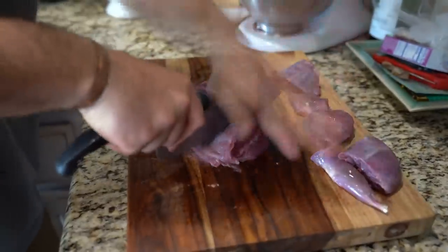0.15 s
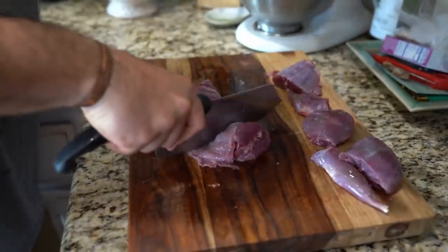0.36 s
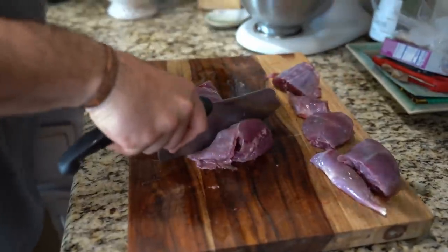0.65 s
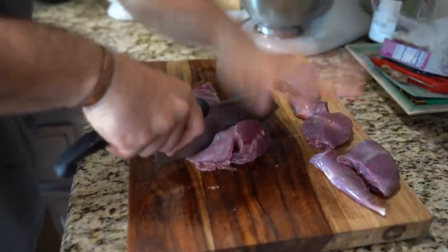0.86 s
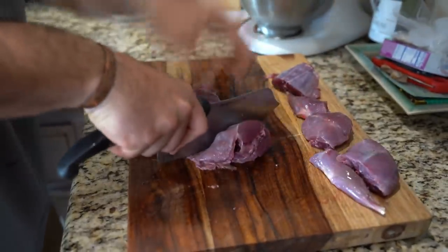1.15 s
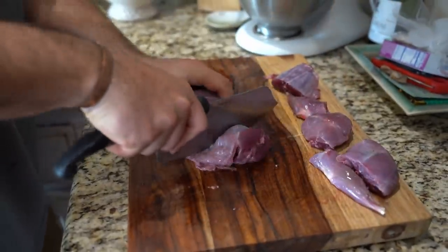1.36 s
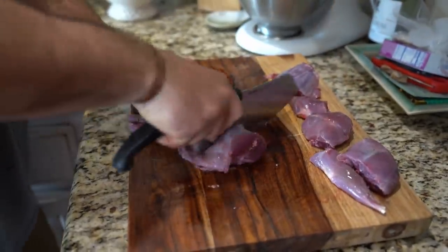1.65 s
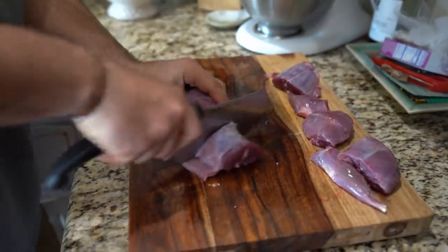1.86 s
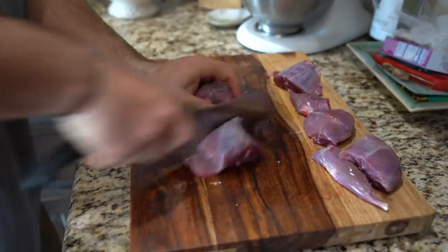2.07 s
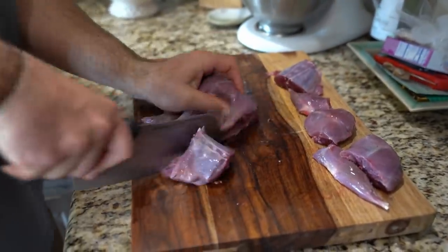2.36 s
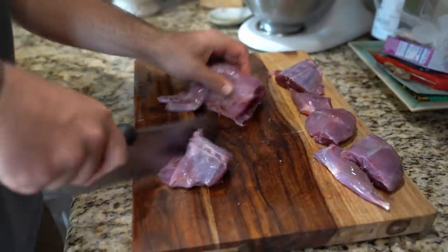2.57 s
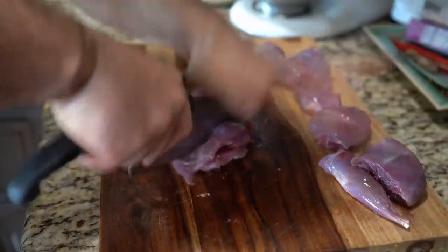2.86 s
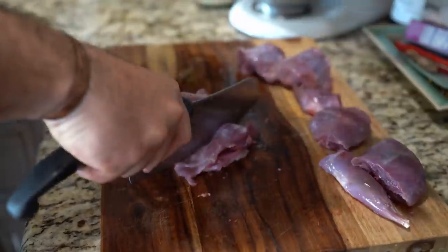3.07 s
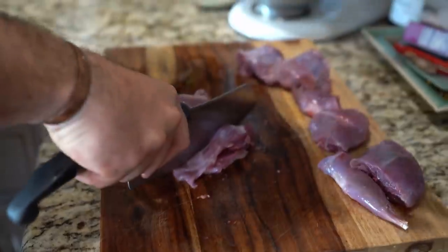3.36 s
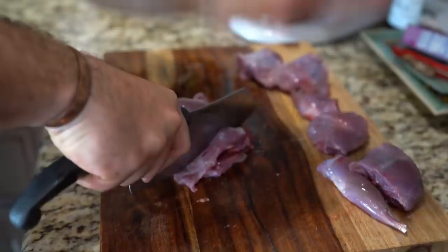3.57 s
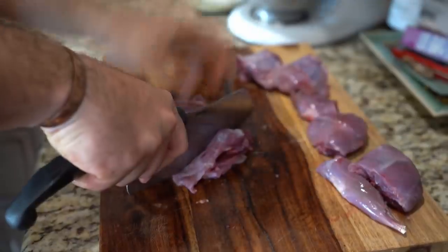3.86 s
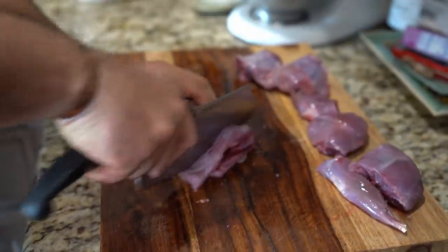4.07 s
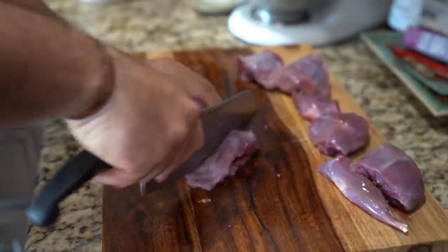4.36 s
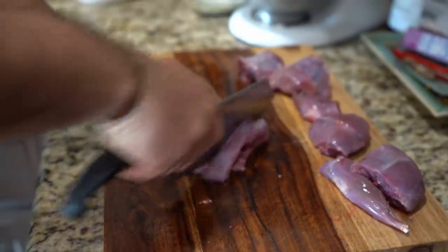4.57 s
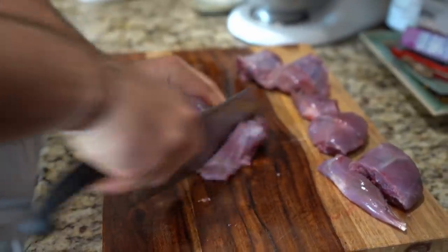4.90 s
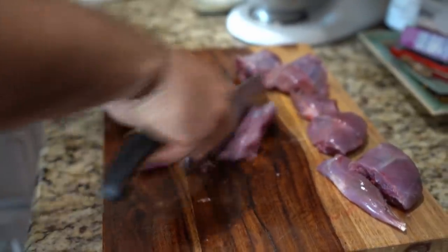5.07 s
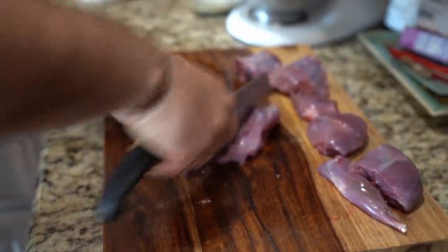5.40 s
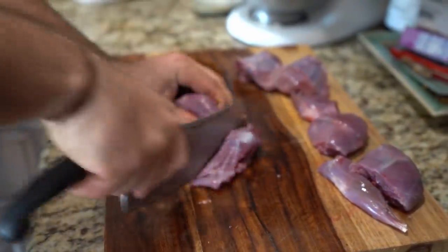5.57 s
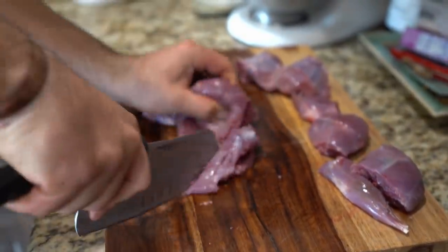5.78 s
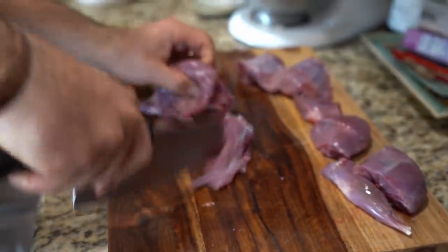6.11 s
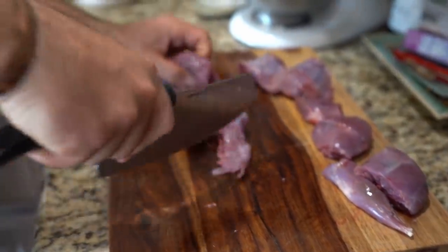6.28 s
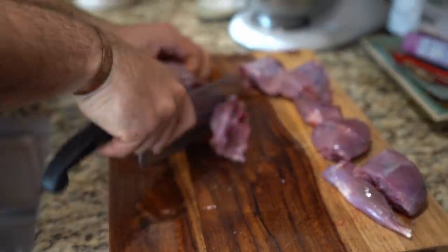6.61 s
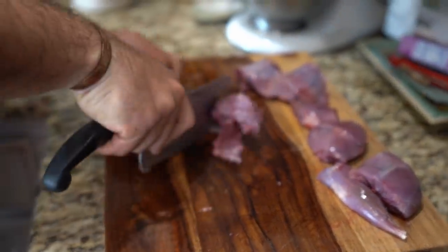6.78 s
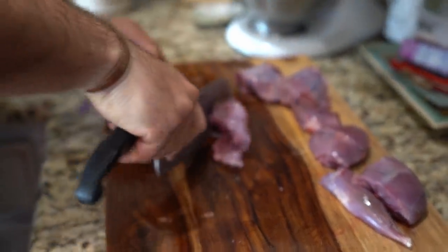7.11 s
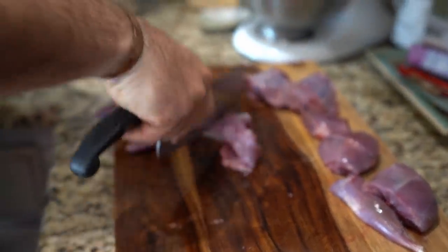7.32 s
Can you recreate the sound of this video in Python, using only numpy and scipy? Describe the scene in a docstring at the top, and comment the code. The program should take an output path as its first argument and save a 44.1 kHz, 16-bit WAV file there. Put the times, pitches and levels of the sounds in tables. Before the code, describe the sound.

Close up in a kitchen, a big knife is pounded through bony meat with cracking thuds, then saws with wet scrapes, snaps and knocks.

```python
"""A big knife joints raw meat on a thick board, close up: twice three palm blows, then sawing.
Blows, stick-slip sawing, bone snaps and knocks are forces on five resonant bodies:
counter, board, blade, cracking bone and knife edge. Flesh adds sliding wet resonances and bursting films.
Pressed board and blade ring on, the kitchen echoes with decaying noise, fridge and ventilation hum.
The recorder's limiter ducks after each heavy blow."""
import sys
import numpy as np
from scipy import signal
from scipy.fft import rfft, irfft
from scipy.io import wavfile
from scipy.ndimage import minimum_filter1d

SR = 44100
rng = np.random.default_rng(int(sys.argv[2]) if len(sys.argv) > 2 else 0)


def master_out(mix):
    """Clip the mix to full scale and print it as 16-bit PCM to the path in sys.argv[1]."""
    frames = np.transpose(np.atleast_2d(mix))
    ceiling = np.clip(frames, -1, 1)
    pcm = np.round(ceiling * 32767).astype(np.int16)
    wavfile.write(sys.argv[1], SR, pcm)


N = 328541
RING = 2 ** 15   # response length, samples
HOLD_10MS = np.sqrt(SR / 100)   # scales unit energy to rms 1 over 10 ms


def from_db(db):
    """Amplitude ratio."""
    return 10 ** (np.asarray(db) / 20)


def unit_energy(x):
    """Scale to energy 1."""
    return x / np.sqrt(np.sum(x ** 2) + 1e-20)


def rms_one(x):
    """Scale to rms 1."""
    return unit_energy(x) * np.sqrt(len(x))


def at_hz(points, hz):
    """Read a spectrum on a log-frequency axis."""
    f, value = np.transpose(points)
    return np.interp(np.log(np.maximum(hz, 1)), np.log(f), value)


def through(x, response):
    """Drive a response with x."""
    return signal.fftconvolve(x, response)[:N]


def drift(knots_per_s):
    """Random values joined by straight lines; spread 1 at the knots."""
    knots = rng.standard_normal(4096)
    return np.interp(np.arange(N) / SR * knots_per_s, np.arange(len(knots)), knots)


def colour(spectrum):
    """Minimum-phase response with this spectrum, by folding the cepstrum; energy 1."""
    log_gain = np.log(from_db(at_hz(spectrum, np.fft.rfftfreq(RING, 1 / SR))))
    cepstrum = irfft(log_gain)
    cepstrum[1:RING // 2] *= 2
    cepstrum[RING // 2 + 1:] = 0
    return unit_energy(irfft(np.exp(rfft(cepstrum))))


def fracture(splinter_s, snap_share):
    """A break that trails off in splinters, whitened to equal strength at all pitches; energy 1."""
    t = np.arange(2048) / SR
    splinters = unit_energy(rng.standard_normal(len(t)) ** 3 * np.exp(-t / splinter_s))
    spectrum = rfft(splinters + snap_share * (t == 0), 2 * len(t))
    return unit_energy(irfft(spectrum / np.abs(spectrum))[:len(t)])


def contacts(table, give_s, splinter_s, snap_share):
    """Forces on the five bodies: a push on the counter, then a burst on the others give_s later."""
    force = np.zeros((5, N + RING))
    for s, *levels_db in table:
        push = from_db(levels_db) * HOLD_10MS
        start, breaks = int(s * SR), int((s + give_s) * SR)
        burst = fracture(splinter_s, snap_share)
        force[0, start] += push[0]
        force[1:, breaks:breaks + len(burst)] += push[1:, None] * burst
    return force[:, :N]


# palm blows on the spine:
# (time [s], thump level [dB], wood level [dB], blade level [dB], crack level [dB], edge level [dB])
PALM_BLOWS = [(0.169, 12, 7.5, 0.5, -3.5, -10.5), (0.5030, 14, 9, 2.5, -4.5, -31),
              (0.818, 11, -2, -11.5, -18, -57), (2.841, 10.5, 3.5, 6.5, 1, -8.5),
              (3.1928, 16, 4.5, 2, 4, -6.5), (3.5000, 16.5, 7.5, 6.5, -1, -45)]


def blows():
    """Forces of the palm driving the blade into bone, which breaks a moment after the push."""
    return contacts(PALM_BLOWS, give_s=0.00332, splinter_s=0.01, snap_share=0.11)


def palm(slap_db, soft_hz):
    """The soft slap of the hand, a heavily damped swing just before the bone breaks."""
    clicks = np.zeros(N)
    for s, thump_db, *rest in PALM_BLOWS:
        clicks[int(s * SR)] = from_db(thump_db + slap_db) * HOLD_10MS
    t = np.arange(RING) / SR
    return through(clicks, unit_energy(np.exp(-np.pi * soft_hz * t) * np.sin(2 * np.pi * soft_hz * t)))


# knife strokes: (start [s], length [s], pressure level [dB], crunch level re pressure [dB])
KNIFE_STROKES = [(0.0, 0.089, -32.5, -12), (1.37, 0.36, -40.5, -3.5), (1.536, 0.1, -9.5, -10),
                 (1.694, 0.11, -11.5, -13), (1.88, 0.081, -9, -15.5), (2.02, 0.18, -9, -16.5),
                 (2.2, 0.12, -20.5, -12), (2.342, 0.083, -16, -14), (2.535, 0.055, -30.5, -8.5),
                 (3.919, .14, -35.5, -8), (4.072, 0.15, -27.5, -6.5), (4.296, 0.081, -23.5, -5.5),
                 (4.413, 0.069, -17, -1), (4.494, 0.085, -30, -4), (4.593, 0.06, -19, 0),
                 (4.699, 0.06, -10.5, -5), (4.81, 0.11, -26, -7.5), (4.855, 0.078, -15, -4),
                 (4.993, .11, -11, -5.5), (5.131, 0.083, -16.5, -3.5), (5.275, 0.054, -10, -4.5),
                 (5.339, 0.22, -22, -2.5), (5.44, 0.12, -7, -11), (5.562, 0.077, -18, -7),
                 (5.629, 0.14, -13.5, -13), (5.886, 0.038, -33.5, 1.5), (6.545, 0.043, -40.5, 2.5),
                 (6.59, 0.059, -30, -8), (6.68, 0.062, -29.5, -3), (6.816, 0.26, -36.5, -4.5)]
ATTACK_S, SAG_DB_PER_S, RELEASE_DB_PER_S = 0.028, 22, 413   # edge bites, eases off, lets go
WET_DB, WET_DB_PER_CRUNCH_DB = -8, 0.99   # wetness at 0 dB crunch; slope


def stroke_gains():
    """Pressure, crunch and wetness: all strokes share one shape, torn fibres let out juice."""
    pressure, crunch = np.zeros((2, N))
    for start, length, pressure_db, crunch_db in KNIFE_STROKES:
        first = max(int(start * SR), 0)
        age = np.arange(min(RING, N - first)) / SR
        sag_db = SAG_DB_PER_S * (age - length / 2)
        release_db = RELEASE_DB_PER_S * np.maximum(age - length, 0)
        effort = np.minimum(age / ATTACK_S, 1) * from_db(pressure_db - sag_db - release_db)
        span = slice(first, first + len(age))
        pressure[span] = np.maximum(pressure[span], effort)
        crunch[span] = np.maximum(crunch[span], effort * from_db(crunch_db))
    return pressure, crunch, from_db(WET_DB) * crunch ** WET_DB_PER_CRUNCH_DB


def slips(per_s, spread_db):
    """Random tiny slips of uneven size and either sign; rms 1."""
    sizes = from_db(spread_db * np.minimum(rng.exponential(1, N), 4)) * rng.choice([-1, 1], N)
    return rms_one(sizes * (rng.random(N) < per_s / SR))


def sawing(pressure, crunch, wetness):
    """Forces on the five bodies as the edge sticks and slips through fibres and along the wood."""
    grip = from_db(2.9 * drift(110))
    fibres = slips(1100, spread_db=0)   # shared by scrape, tear and hiss
    scrape_slips = 0.5 * fibres + 0.65 * slips(1500, spread_db=4.5)
    tear_slips = 1.2 * fibres + 1.22 * slips(2000, spread_db=0)
    hiss_slips = 0.18 * fibres + 0.95 * slips(5600, spread_db=-4)
    rumble = from_db(-4) * crunch * slips(1800, spread_db=-0.5)
    # contact wanders along the edge: drag, scrape and tear each get spurts of their own
    drag = from_db(-10.5) * pressure * from_db(1.6 * drift(90)) * slips(3000, spread_db=0)
    scrape = from_db(-9) * pressure * from_db(1.44 * drift(120)) * scrape_slips
    tear = from_db(-8.5) * crunch * from_db(1.6 * drift(150)) * tear_slips
    hiss = from_db(-4.5) * wetness * hiss_slips
    return grip * np.array([rumble, drag, scrape, tear, hiss])


def shared(strike_db, brightness_db, share_db):
    """Levels of wood, blade, crack and edge [dB]: a brighter contact favours the higher bodies."""
    octaves_re_blade = np.array((-1.15, 0, 0.85, 2.4))
    return strike_db + np.array(share_db) + brightness_db * octaves_re_blade


# bone and gristle giving way: (time [s], strike level [dB], brightness [dB/octave])
BONE_SNAPS = [(1.5472, -32, -6), (1.573, -24.5, 4), (1.7025, -21, -2.5), (1.7607, -18.5, -2),
              (2.2621, -26.5, -8.5), (2.36, -24.5, -3.5), (2.381, -19.5, -2), (4.1224, -26.5, -5),
              (4.177, -21.5, -2.5), (4.427, -15.5, -1.5), (4.7235, -12, -1.5), (4.7381, -9.5, -4),
              (4.7615, -10, -1.5), (4.892, -20.5, -1), (4.992, -29.5, 6), (5.0313, -7.5, -1.5),
              (5.081, -8.5, -1), (5.2073, -15, 4), (5.2312, -13, 0.5), (5.2671, -16.5, -0.5),
              (5.2917, -9.5, -1), (5.4479, -13.5, 0.5), (5.51, -15.5, 0.5), (5.655, -18, -2.5),
              (5.947, -44, 2), (5.975, -41, 6), (6.0166, -41.5, 4.5), (6.7018, -31.5, 1.5),
              (6.9168, -32.5, 4.5)]
SNAP_SHARE_DB = (-4, -2, -2, -9.5)   # wood, blade, crack, edge
SNAP_THUMP_DB = -4.5   # push on the counter re strike


def snaps():
    """Forces of splintering bone; the harder the snap, the more it shakes the counter."""
    rows = [(s, db + SNAP_THUMP_DB, *shared(db, bright, SNAP_SHARE_DB)) for s, db, bright in BONE_SNAPS]
    return contacts(rows, give_s=0, splinter_s=0.0052, snap_share=0.25)


# light knocks on the board, the first a dull, dying blow:
# (time [s], thump level [dB], strike level [dB], brightness [dB/octave])
BOARD_KNOCKS = [(0.003, -16.5, -33.5, -13), (1.2377, -18, -21.5, -7.5), (1.3612, -20.5, -14, 0.5),
                (2.055, -26, -23, 2), (2.5015, -48, -35, -4.5), (4.4579, -6.5, -10.5, 0.5),
                (5.3155, -6.5, -12, 4), (5.352, -10.5, -22, -7), (5.572, -13, -32, 7.5),
                (5.775, -13, -30, 1), (6.1175, -16, -27, 4.5), (6.635, -19, -38, -12),
                (6.7715, -40, -25.5, -3), (7.2528, -9.5, -25, -2.5), (7.2815, -14.5, -31, -5.5)]
KNOCK_SHARE_DB = (-4.5, -3, -6, -12.5)   # wood, blade, crack, edge


def knocks():
    """Forces of a dull, dying blow, then of knife and meat knocking on the board: a short burst each."""
    rows = [(s, thump_db, *shared(db, bright, KNOCK_SHARE_DB)) for s, thump_db, db, bright in BOARD_KNOCKS]
    return contacts(rows, give_s=0, splinter_s=0.005, snap_share=0.9)


def slither(centre_hz, swing_octaves, knots_per_s):
    """A wet gap beside the blade whose resonance slides as it opens and closes; rms 1."""
    hz = centre_hz * 2 ** (swing_octaves * drift(35))
    level = drift(knots_per_s) * from_db(2.6 * drift(45))
    return rms_one(level * np.sin(2 * np.pi * np.cumsum(hz) / SR))


def squelch(per_s, cycles, low_hz, high_hz):
    """Tiny wet films burst, each falling 60 dB in some cycles of its own rising pitch; rms 1."""
    t, out = np.arange(1024) / SR, np.zeros(N + 1024)
    for when, pitch, size, rise in rng.random((int(per_s * N / SR), 4)):
        hz, start = low_hz * (high_hz / low_hz) ** pitch, int(when * N)
        age = t * hz / cycles
        ring = from_db(-60 * age) * np.sin(2 * np.pi * hz * t * (1 + 0.32 * rise * age))
        out[start:start + len(t)] += from_db(20 * size ** 2) * unit_energy(ring)
    return rms_one(out[:N])


def flesh(pressure, crunch, wetness):
    """The meat's own voice: sliding cavities, large and small squelching pockets, fine wet crackle."""
    deep = from_db(-18) * pressure * slither(centre_hz=528.6, swing_octaves=0.6, knots_per_s=310)
    middle = from_db(-11.5) * pressure * slither(centre_hz=1370, swing_octaves=0.33, knots_per_s=260)
    bright = from_db(-11) * crunch * slither(centre_hz=2592, swing_octaves=0.35, knots_per_s=560)
    squish = from_db(-13.5) * pressure * squelch(per_s=180, cycles=32, low_hz=1000, high_hz=1900)
    pockets = from_db(-4) * crunch * squelch(per_s=330, cycles=32, low_hz=1160, high_hz=4030)
    crackle = from_db(-9) * wetness * squelch(per_s=110, cycles=69, low_hz=4460, high_hz=11500)
    return deep + middle + bright + squish + pockets + crackle


# meat gripped and peeled apart: (time [s], pitch [Hz], level [dB])
WET_SMACKS = [(1.824, 1560, -15), (2.644, 8450, -35.5), (3.971, 2710, -32), (4.019, 1900, -32),
              (4.08, 4140, -34), (4.102, 3860, -34), (6.771, 1010, -26), (6.865, 2780, -36),
              (6.925, 2230, -24), (6.975, 2740, -38)]
SMACK_CYCLES, SMACK_PHASE_GAIN = 24, 0.05   # cycles to -60 dB; relative phase advance by then


def smacks():
    """A wet pocket tears open and rings briefly, rising in pitch."""
    t, out = np.arange(4096) / SR, np.zeros(N)
    for s, hz, db in WET_SMACKS:
        age = t * hz / SMACK_CYCLES
        ring = from_db(-60 * age) * np.sin(2 * np.pi * hz * t * (1 + SMACK_PHASE_GAIN * age))
        smack = unit_energy(signal.fftconvolve(ring, fracture(splinter_s=0.004, snap_share=0.2)))
        start = int(s * SR)
        out[start:start + len(smack)] += from_db(db) * HOLD_10MS * smack
    return out


def resonances(modes):
    """Damped modes of a body; neighbours swing in opposite senses; energy 1."""
    t = np.arange(RING) / SR
    swings = [from_db(db) * width * np.exp(-np.pi * width * t) * np.cos(2 * np.pi * hz * t)
              for hz, width, db in modes]
    return unit_energy(sum(swings[::2]) - sum(swings[1::2]))


# deep modes of board on counter: (frequency [Hz], relative level [dB], t60 [s])
COUNTER_MODES = [(35.7, -13, 0.69), (63.4, -2, 0.32), (73.1, 5.5, 0.32), (98.8, 5, 0.21),
                 (131.1, -2.5, 0.23), (168, -9.5, 0.13)]
# wooden board; blade damped by the meat: (frequency [Hz], width [Hz], relative level [dB])
BOARD_MODES = [(224, 92, -6), (310.7, 25, -1), (417.5, 42, 0.5), (551, 87, -3.5), (655.4, 27.8, 9.5),
               (743.6, 40, 4.5), (909, 78, -8)]
BLADE_MODES = [(1074, 360, -6), (1331, 55.4, 9.5), (1415, 66, 4.5), (1534, 92, 8.5), (1685, 106, 4),
               (2100, 50, 3), (2330, 35, -5.5)]
# crack as the blade radiates it; fine edge: (frequency [Hz], relative level [dB per Hz])
CRACK_SPECTRUM = [(100, -47), (900, -2.5), (1600, -4), (1920, -2.5), (2210, -1.5), (2560, 1), (2800, 1.5),
                  (3100, 1), (3350, 1.5), (3680, -0.5), (4250, -5.5), (5200, -18.5), (16000, -45.5)]
EDGE_SPECTRUM = [(200, -34), (3000, -19.5), (5000, 6.5), (8000, 6), (11000, 0.5), (15500, -3.5)]


def bodies():
    """Responses of counter, board, blade, cracking bone and knife edge; energy 1 each."""
    t = np.arange(RING) / SR
    counter = sum((-1) ** k * from_db(db - 60 * t / t60) * np.sin(2 * np.pi * hz * t)
                  for k, (hz, db, t60) in enumerate(COUNTER_MODES))
    return (unit_energy(counter), resonances(BOARD_MODES), resonances(BLADE_MODES),
            colour(CRACK_SPECTRUM), colour(EDGE_SPECTRUM))


# clusters of close modes, blade pressed on board: (frequency [Hz], relative level [dB], t60 [s])
AFTER_RING_MODES = [(690, 3, 0.59), (1307, -4.5, 0.48), (1476, -5, 0.53), (2228, 0, 0.64), (3055, -7, 0.52)]
AFTER_RING_DB, CLUSTER_KNOTS_PER_S = -9, 170   # level re driving force; rate of the beats


def after_ring(force):
    """Knife and board, pressed together, ring on with uneven beats."""
    t = np.arange(RING) / SR
    modes = sum(from_db(db - 60 * t / t60) * unit_energy(drift(CLUSTER_KNOTS_PER_S)[:RING])
                * np.sin(2 * np.pi * hz * t) for hz, db, t60 in AFTER_RING_MODES)
    return from_db(AFTER_RING_DB) * through(force, unit_energy(modes))


# kitchen echo: (frequency [Hz], level [dB])
ECHO_LEVEL = [(60, -29), (160, -0.5), (300, -1.5), (700, -9.5), (3500, -9), (7000, -6), (15000, -31.5)]
# kitchen decay: (frequency [Hz], t60 [s])
ECHO_T60 = [(100, 0.66), (700, 0.64), (3500, 0.68), (8000, 0.58), (15000, 0.5)]


def kitchen(build_s):
    """Diffuse echo: noise that builds up quickly and dies band by band."""
    t, out = np.arange(RING) / SR, np.zeros(RING)
    edges_hz = np.geomspace(45, 17000, num=15)
    for low, high in zip(edges_hz, edges_hz[1:]):
        hz = np.sqrt(low * high)
        bandpass = signal.butter(2, [low, high], "band", fs=SR, output="sos")
        band = signal.sosfilt(bandpass, rng.standard_normal(RING))
        tail = band * (1 - np.exp(-t / build_s)) * from_db(-60 * t / at_hz(ECHO_T60, hz))
        out += unit_energy(tail) * from_db(at_hz(ECHO_LEVEL, hz)) * np.sqrt(2 * (high - low) / SR)
    return out


# fridge and ventilation: (frequency [Hz], relative level [dB per Hz])
HUM_SPECTRUM = [(15, -12), (28, 1), (40, -12), (58, -12.5), (90, -10), (150, -21), (210, -24.5),
                (300, -20.5), (460, -31.5), (760, -40), (2500, -47.5), (9800, -58.5), (15500, -58)]


def hum(level_db):
    """Fridge and ventilation: steady coloured noise."""
    return from_db(level_db) * through(rng.standard_normal(N), colour(HUM_SPECTRUM))


def scene():
    """Blows, strokes and small contacts drive the same bodies in one room."""
    gains = stroke_gains()
    responses = bodies()
    blow_forces, knock_forces = blows(), knocks()
    cut_forces = sawing(*gains) + knock_forces + snaps()
    chopping = sum(through(f, body) for f, body in zip(blow_forces, responses))
    chopping = chopping + palm(slap_db=-26, soft_hz=360)
    cutting = sum(through(f, body) for f, body in zip(cut_forces, responses))
    cutting = cutting + flesh(*gains) + smacks()
    ringing = after_ring(from_db(1) * blow_forces[2] + knock_forces[2])   # forces on the blade
    # blows set the whole board radiating and fill the room more than cutting does
    echo = through(chopping + from_db(-2) * cutting, kitchen(build_s=0.00043))
    return (chopping + cutting + ringing + echo + hum(level_db=-31.5))[None]


def limiter(x, threshold_db, attack_s, hold_s, release_db_per_s):
    """The gain drops on overload, stays down for a moment and recovers."""
    over_db = np.maximum(20 * np.log10(np.abs(x) + 1e-9) - threshold_db, 0)
    half = int(hold_s * SR / 2)
    held_db = -minimum_filter1d(-over_db, size=2 * half + 1, origin=half)
    ramp_db = release_db_per_s * np.arange(N) / SR
    duck_db = np.maximum.accumulate(held_db + ramp_db) - ramp_db
    pole = np.exp(-1 / (attack_s * SR))
    return x * from_db(-signal.lfilter([1 - pole], [1, -pole], duck_db))


def record(dry):
    """The limiter is too slow for the cracks, which clip softly; a low-pass cuts the top."""
    limited = limiter(dry[0], threshold_db=-0.5, attack_s=0.0019, hold_s=0.015, release_db_per_s=252)
    clipped = limited / (1 + (limited / 0.95) ** 6) ** (1 / 6)
    cutoff_hz = 15900
    lowpass = signal.ellip(10, 0.2, 70, cutoff_hz, fs=SR, output="sos")
    return signal.sosfilt(lowpass, clipped)[None]


dry = scene()
out = record(dry)
master_out(out)
```